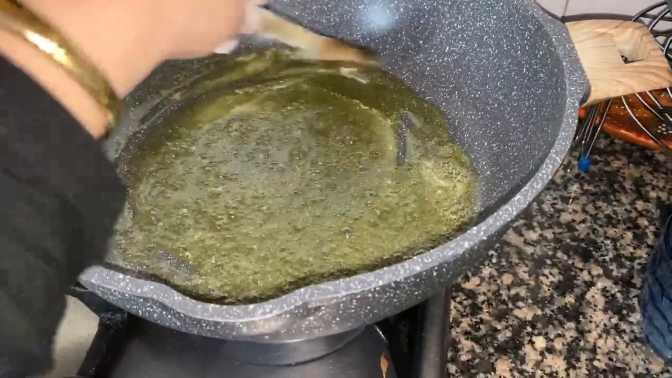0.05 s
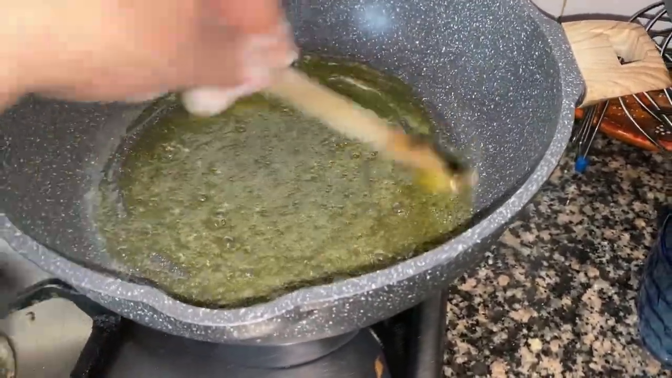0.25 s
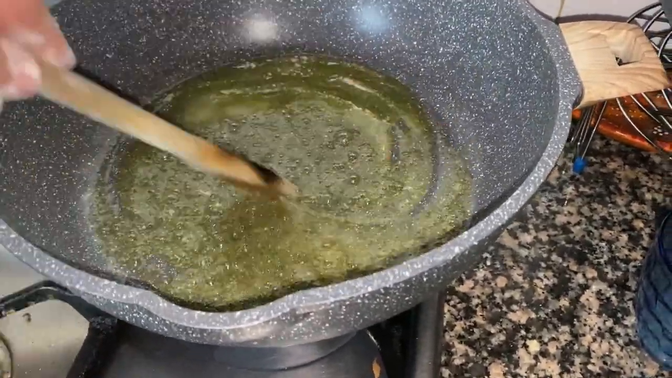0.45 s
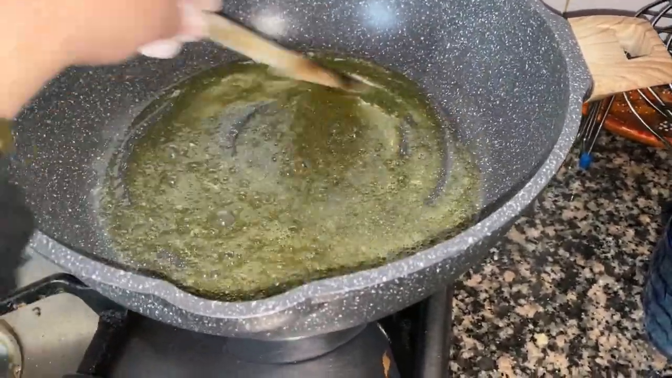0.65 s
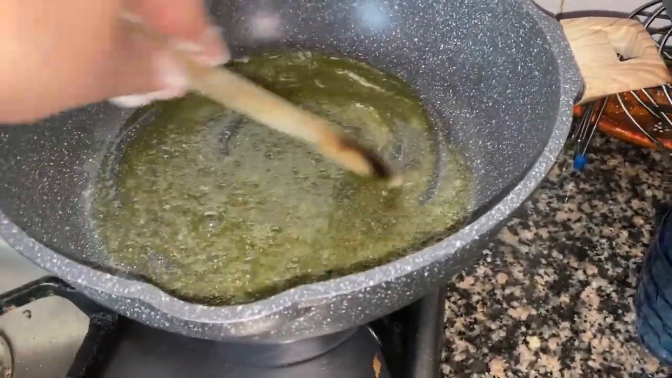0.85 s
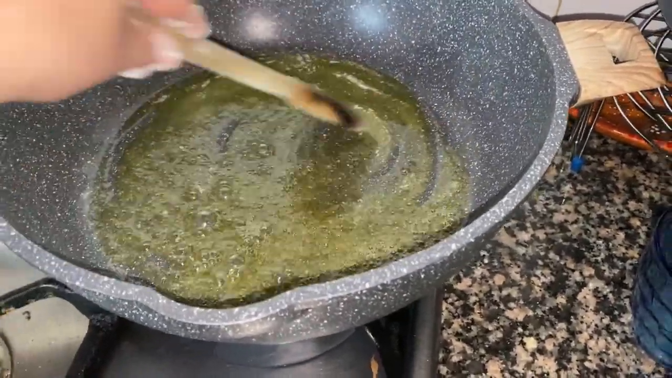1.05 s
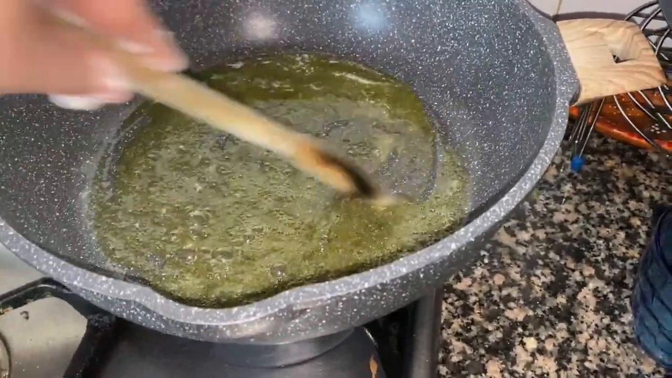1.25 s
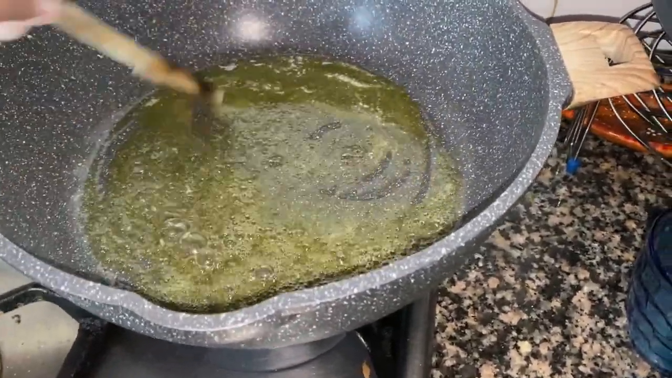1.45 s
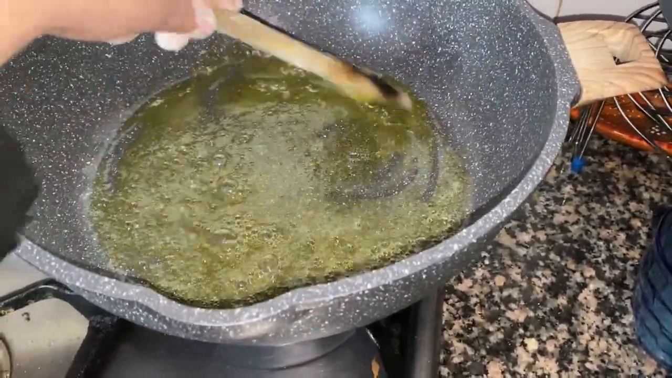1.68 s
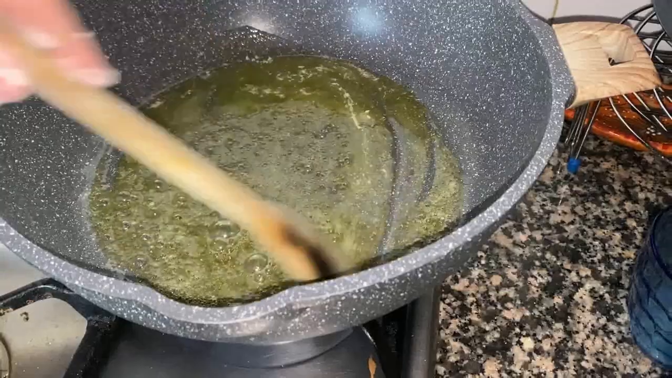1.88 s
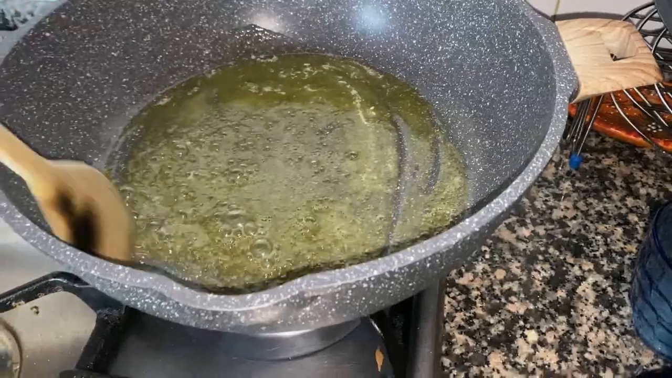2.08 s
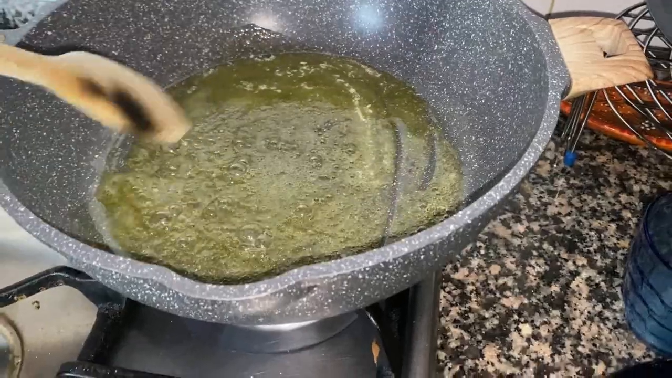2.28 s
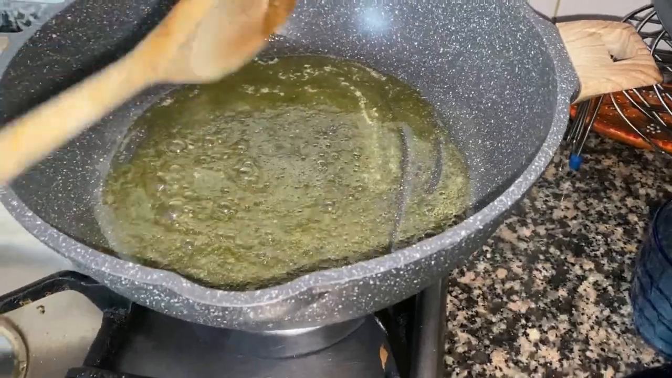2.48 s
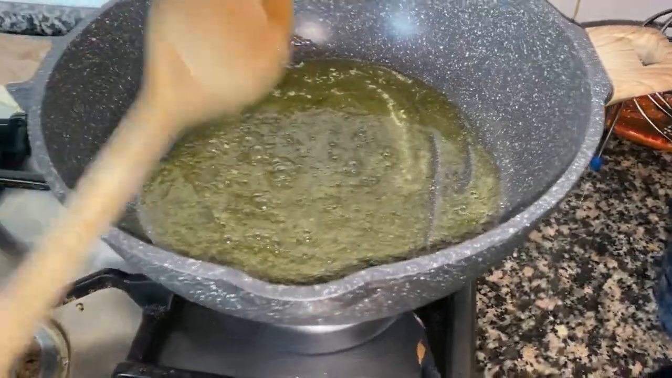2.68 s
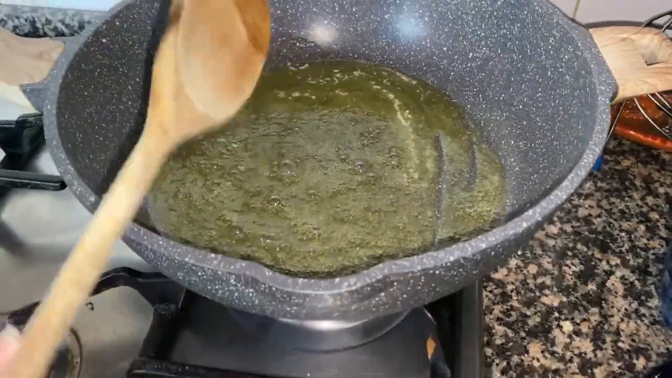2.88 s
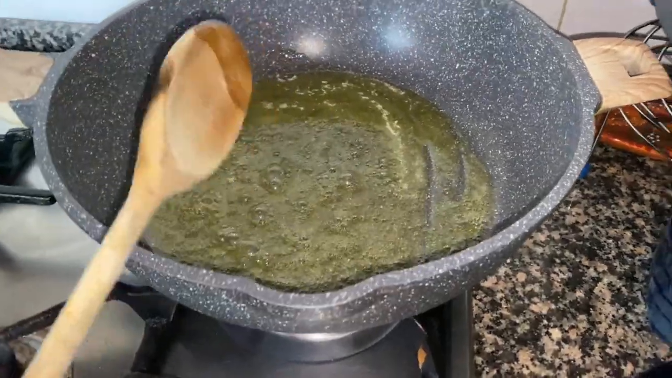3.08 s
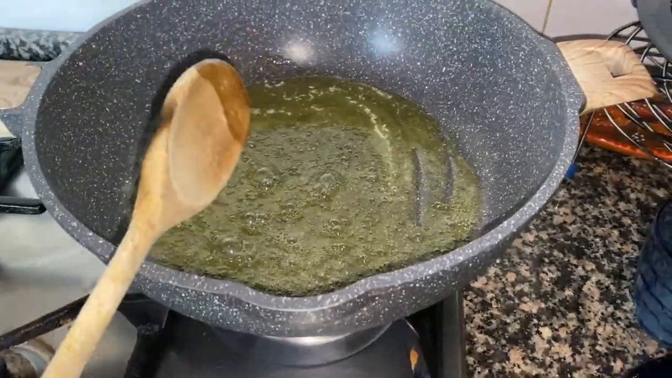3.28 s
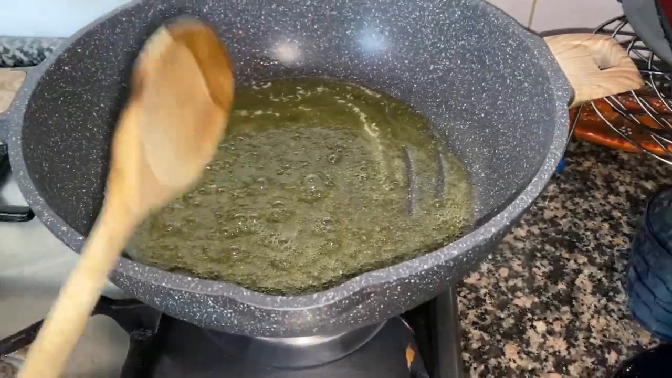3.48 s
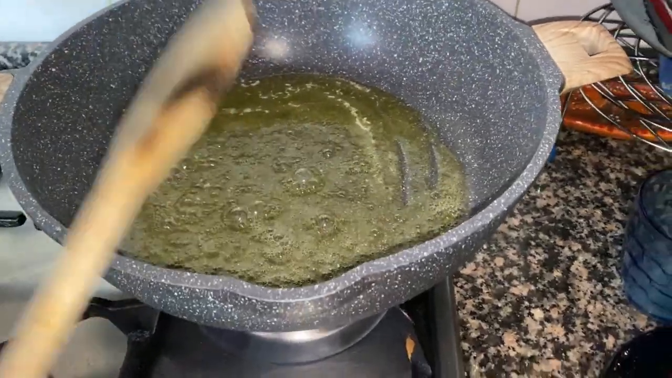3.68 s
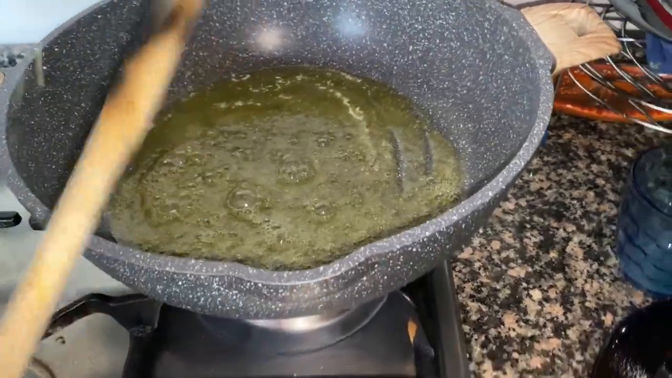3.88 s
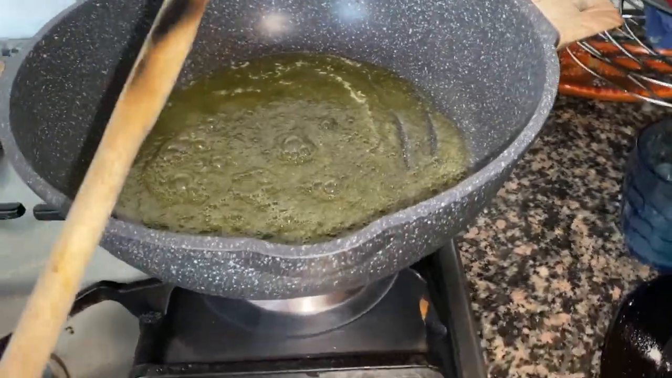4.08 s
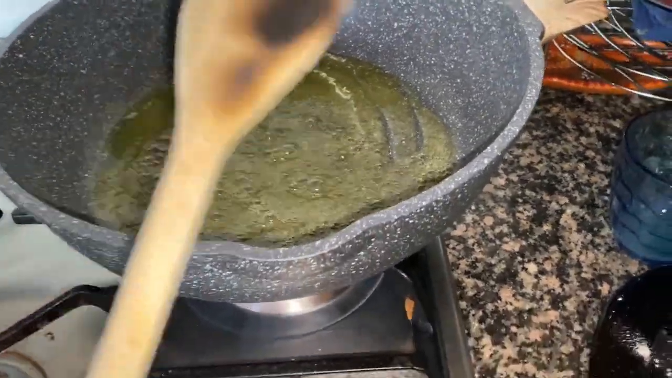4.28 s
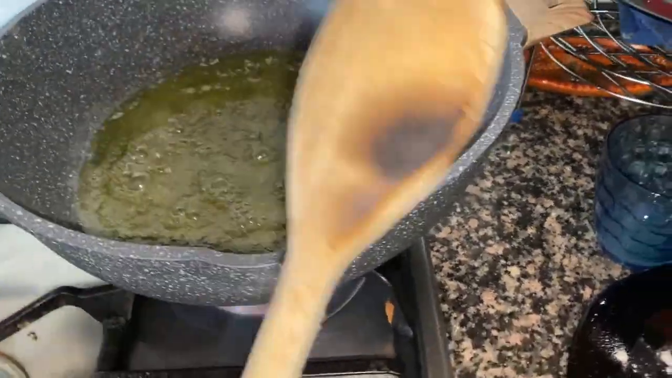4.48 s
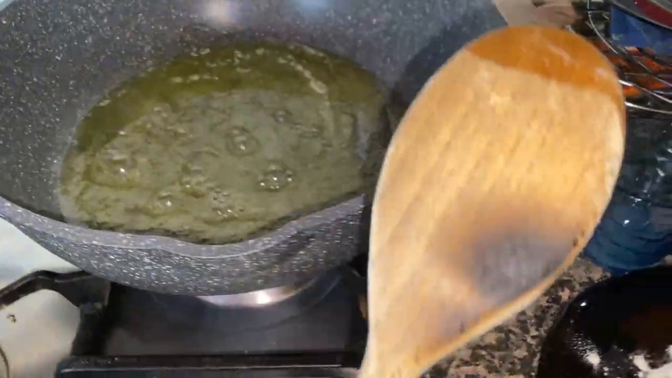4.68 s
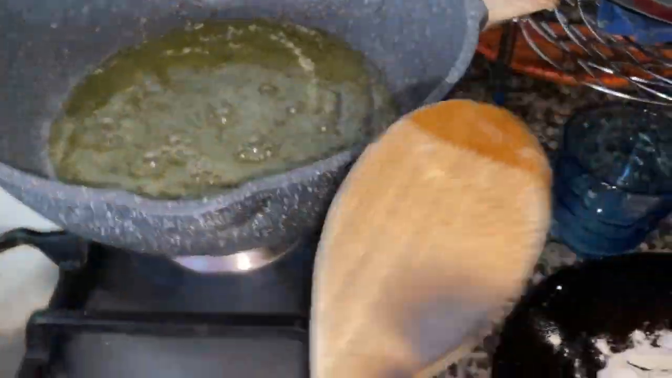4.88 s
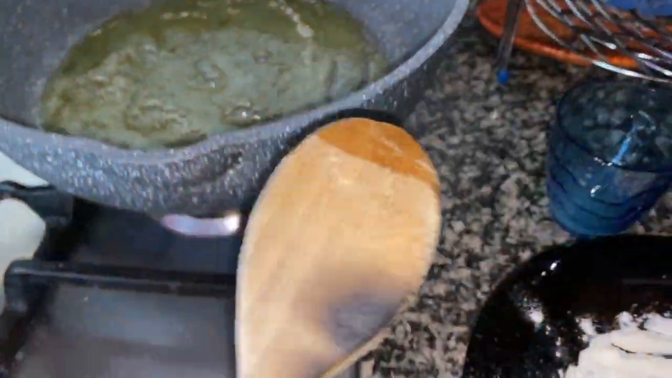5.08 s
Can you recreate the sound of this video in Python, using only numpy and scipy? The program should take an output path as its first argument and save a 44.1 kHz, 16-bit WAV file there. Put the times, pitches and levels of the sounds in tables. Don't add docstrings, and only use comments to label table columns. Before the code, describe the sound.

Close to a hand-held phone in a small, hard-surfaced kitchen, butter sizzles softly in hot oil: fine clumpy crackle over smooth hiss, with separate bright, high bubble pops. A faint gas-burner hiss and room tone lie beneath. From 0 to about 2 s a wooden spoon sweeps round the coated bottom in short, stuttering, gritty scrapes, strongest in the first 0.7 s and again from 1.25 s, quieter between, with very faint contacts and low handling bumps. At 2.0 s it knocks the pan wall once, round and hollow. After a pause with sizzle and pops, four much louder, sharp raps hit the rim at about 2.87, 3.06, 3.26 and 3.47 s, some with quick rebounds; the damped pan clanks briefly, its trivet rattles and the room adds a short tail. From 3.7 to 5.1 s the sizzle calms, dotted with crisp pops.

```python
import sys
import numpy as np
from scipy import signal
from scipy.fft import rfft, irfft, next_fast_len
from scipy.io import wavfile

SR = 44100
rng = np.random.default_rng(int(sys.argv[2]) if len(sys.argv) > 2 else 0)


def store_wav(level_fs):
    pcm = np.round(np.clip(np.atleast_2d(level_fs), -1, 1) * 32767)
    wavfile.write(sys.argv[1], SR, pcm.T.astype(np.int16))


def undo_db(level):
    steps = np.asarray(level, float) / 20
    return 10 ** steps


N = 226718

# middle t/s, length/s, bottom level/dB, wall level/dB, grit level/dB
STROKES = [(0.047, 0.11, -50, -46, -52.5), (0.184, 0.11, -46, -47.5, -47.5), (0.333, 0.14, -43, -57, -51.5),
           (0.413, 0.095, -47.5, -43, -49), (0.517, 0.13, -44.5, -38.5, -48.5),
           (0.65, 0.05, -39.5, -62, -60), (0.887, 0.36, -52.5, -63, -60.5), (1.112, 0.6, -64, -64.5, -64.5),
           (1.273, 0.094, -49.5, -73, -58), (1.39, .18, -43.5, -45.5, -52.5),
           (1.488, 0.074, -43.5, -60, -52), (1.573, 0.15, -49.5, -49, -68), (1.656, 0.032, -39.5, -41, -57),
           (1.797, 0.11, -42, -47.5, -51), (1.922, 0.14, -41, -44, -49), (2.1, 0.1, -59, -62, -50.5)]
# f/Hz, width/Hz, level/dB
SCRAPED = [(323, 120, -7), (572.6, 50, 5.5), (891, 11.3, 0), (1110, 29, -43), (1448, 45, 1),
           (1618, 24, 6.5), (2220, 120, 1.5), (3620, 310, -1), (4400, 32, 16), (4690, 20, 20)]


def rms_one(x):
    return x / np.sqrt(np.mean(x ** 2) + 1e-20)


def in_time(rows):
    s, *columns = np.transpose(rows)
    return [np.interp(np.arange(N) / SR, s, c, right=-120) for c in columns]


def at_hz(points, hz):
    table_hz, values = np.array(points)[:, 0], np.array(points)[:, 1]
    return np.interp(np.log(hz), np.log(table_hz), values)


def swells(rows):
    middle, length, *columns = np.transpose(rows)
    offset = (np.arange(N) / SR - middle[:, None]) / length[:, None]
    bells = np.exp(-8 * np.square(offset))
    return [np.sqrt(undo_db(c) ** 2 @ bells) for c in columns]


def drift(rate_hz):
    r = np.exp(-80 * np.pi * rate_hz / SR)
    white = rng.standard_normal(N // 40 + 2002)
    slow = signal.lfilter([1], [1, -2 * r, r * r], white)[2000:]
    return np.interp(np.arange(N) / 40, np.arange(len(slow)), rms_one(slow))


def grains(per_s, spread_db):
    sizes = undo_db(spread_db * np.minimum(rng.exponential(1, N), 5))
    signs = rng.choice([-1, 1], N)
    return sizes * signs * (rng.random(N) < per_s / SR)


def ring(clicks, hz, t60):
    r, w = undo_db(-60 / (t60 * SR)), 2 * np.pi * min(hz, 19000) / SR
    return signal.lfilter([0, np.sin(w)], [1, -2 * r * np.cos(w), r * r], clicks + 1e-18)


def resonances(x, peaks):
    out = 0
    for k, (hz, width, db) in enumerate(peaks):
        r = np.exp(-np.pi * width / SR)
        b = (1 - r * r) / 2 * np.array([1, 0, -1])
        a = [1, -2 * r * np.cos(2 * np.pi * hz / SR), r * r]
        out = out + (-1) ** k * undo_db(db) * signal.lfilter(b, a, x)
    return out


def band_pass(x, low_hz, high_hz):
    return signal.sosfilt(signal.butter(2, [low_hz, high_hz], "band", fs=SR, output="sos"), x)


def stereo_noise(size, spectrum, t60s=None):
    # f/Hz, likeness 0 to 1
    likeness = [(30, 1), (125, 0.78), (500, 0.36), (2000, 0.1), (6000, 0.13)]
    out, edges, t = 0, 22 * 2 ** np.arange(0, 9.9, .5), np.arange(size) / SR
    white = rng.standard_normal((2, 2, size))
    for k, (low, high) in enumerate(zip(edges, edges[1:])):
        mid, side = band_pass(white[k % 2], low, high)
        hz = np.sqrt(low * high)
        alike = np.clip(at_hz(likeness, hz), 0, 1)
        fall_db, rise = 0, 1
        if t60s is not None:
            fall_db = -60 * t / at_hz(t60s, hz)
            rise = 1 - np.exp(-t * hz / 0.72)
        pair = np.sqrt(1 + alike) * mid + np.sqrt(1 - alike) * side * [[1], [-1]]
        out = out + rise * undo_db(at_hz(spectrum, hz) + fall_db) * pair
    return out


def background():
    # f/Hz, level/dB per Hz
    room_tone = [(20, -28), (79, -6), (500, 0), (1060, -6.5), (1260, -14), (1970, -25), (5000, -21),
                 (6500, -46)]
    # f/Hz, width/Hz, level/dB
    burner = [(568.5, 35, 1), (1068.5, 28, -2), (1702, 28, -1.5)]
    tone = rms_one(stereo_noise(N, room_tone))
    jets = resonances(rng.standard_normal((2, N)), burner)
    jets = rms_one(resonances(jets, [(hz, 3 * width, 0) for hz, width, db in burner]))
    return undo_db(-60) * (undo_db(-0.5) * tone + undo_db(-1.0 + drift(2.7)) * jets)


def handling():
    # middle t/s, length/s, rumble level/dB
    bumps = [(0.02, 0.087, -30.5), (0.4, 1, -61), (1.0, 0.41, -64), (0.79, 0.065, -60),
             (1.17, 0.042, -48.5), (1.23, 0.035, -34), (1.295, .03, -40.5), (1.35, 0.075, -30),
             (1.45, 0.041, -36), (1.57, 0.17, -45), (1.75, 0.25, -52), (1.94, 0.11, -52),
             (2.23, 0.045, -61), (2.9, 0.039, -24.5), (3.11, 0.14, -35.5), (3.265, 0.033, -49),
             (3.35, 0.1, -38), (3.485, 0.074, -32), (3.6, 0.17, -39), (3.87, 0.45, -60.5),
             (4.2, 0.79, -67.5), (4.6, 0.13, -64), (5.1, 1, -67.5)]
    rumble = [(25, -60), (45, 1), (80, 0.5), (140, -2), (250, -53), (500, -59), (1000, -85)]   # f/Hz, dB per Hz
    return swells(bumps)[0] * rms_one(stereo_noise(N, rumble))


def sizzle():
    # t/s, level/dB
    flare = [(0.0, -57.5), (0.13, -50.5), (0.9, -57), (1.33, -54), (1.9, -52.5), (2.4, -56), (2.9, -52.5),
             (3.44, -58.5), (3.7, -57.5), (5.14, -62)]
    # f/Hz, level/dB per Hz
    fizz = [(1500, -6.5), (3500, -12), (5200, -4.5), (7000, -7), (9000, -8), (12000, -7.5), (14000, -11),
            (16500, 6)]
    clicks = grains(2500 * undo_db(4.5 * drift(17.0)), spread_db=5.5)
    pitches, dealt = np.geomspace(3000, 16000, 16), rng.integers(0, 16, N)
    crackle = 0
    for k, hz in enumerate(pitches):
        crackle = crackle + undo_db(at_hz(fizz, hz)) * hz * ring(clicks * (dealt == k), hz, 35.0 / hz)
    hiss = rms_one(stereo_noise(N, [(700, -48.0)] + fizz))
    return undo_db(in_time(flare)[0] + 4.0) * (undo_db(-4.5) * rms_one(crackle) + undo_db(-3.0) * hiss)


def bursts_table():
    # t/s, peak level/dB, f/Hz, snap level over the ring/dB
    clear = [(0.0485, -27, 6000, -20), (0.1732, -33, 4130, -18), (0.2784, -30, 13900, -10),
             (0.5695, -26.5, 8900, -22), (0.6205, -30.5, 8700, -11), (0.667, -33.5, 9000, -18),
             (0.8768, -32, 9300, -26), (1.2733, -24.5, 5600, -34), (1.6155, -36, 8140, -8),
             (1.6653, -22.5, 8040, -27), (1.822, -31, 6200, -23), (2.2567, -33, 11800, -9),
             (2.349, -39.5, 5350, -26), (2.4355, -39.5, 5700, -9), (2.5922, -28, 8900, -20),
             (2.7027, -29.5, 5270, -29), (3.8226, -33.5, 8500, -11), (3.854, -32, 9490, -12),
             (3.9386, -37, 7040, -14.5), (3.996, -33.5, 10200, -7.5), (4.0618, -33.5, 10450, -9),
             (4.126, -30.5, 5530, -34), (4.155, -30, 7600, -24), (4.272, -33.5, 7160, -18),
             (4.395, -39, 12150, -3), (4.7236, -31.5, 11300, -9), (4.7643, -42.5, 6200, -19),
             (4.8449, -31.5, 8300, -18.5), (4.8974, -31.5, 7500, -26), (4.9886, -31.5, 13100, -4)]
    twins = [(s + 0.008, db - 26, 1.16 * hz, snap_db) for s, db, hz, snap_db in clear]
    faint_db, spread_db, snap_db = -41, 2, -26
    luck = rng.random((55, 3))
    faint = [(a * N / SR, faint_db + spread_db * (4 * b - 2), 5500 * 2.36 ** c, snap_db) for a, b, c in luck]
    return clear + twins + faint


def pops():
    out, t = np.zeros(N + 4000), np.arange(4000) / SR
    table = bursts_table()
    scatter = rng.standard_normal((len(table), 4000)) * undo_db(-60 * t / 0.042 - 14.5) * (t > .0015)
    click = np.eye(1, 4000, round(.0005 * SR))[0]
    bright = signal.butter(2, 9000, "high", fs=SR, output="sos")
    for (s, db, hz, snap_db), echo in zip(table, scatter):
        cycles = 11.8 + 5.8 * np.log2(hz / 8000)
        age = t * hz / max(cycles, 2) * 6.4
        bubble = age * np.exp(1 - age) * np.sin(2 * np.pi * hz * t)
        above = signal.butter(2, 0.36 * hz, "high", fs=SR, output="sos")
        tail = signal.sosfilt(above, ring(echo, hz, 13.0 / hz))
        snap = undo_db(snap_db + 2.0) * signal.sosfilt(bright, click + 0.24 * echo)
        out[round(s * SR):][:4000] += undo_db(db + 0.5) * (bubble + tail + snap)
    return out[:N]


def sweep_phase():
    middle, length, *_, grit_db = np.transpose(STROKES)
    phase = 2 * (np.arange(0, N, 64) / SR - middle[:, None]) / length[:, None]
    weight = undo_db(grit_db)[:, None] ** 2 * np.exp(-2 * phase ** 2) + 1e-30
    strongest = (weight * np.clip(phase, -1, 1)).sum(0) / weight.sum(0)
    return np.repeat(strongest, 64)[:N]


def swish():
    level = swells(STROKES)[2]
    centre_hz = 1850 * 2 ** (-0.5 * sweep_phase())
    grit, out = grains(6000, spread_db=2.0), 0
    grit = grit + undo_db(12.5) * resonances(grit, SCRAPED[3:8])
    for hz in np.geomspace(1200, 5600, 8):
        band = band_pass(grit, hz / 1.12, hz * 1.12)
        octaves_off = np.log2(hz / np.maximum(centre_hz, 800))
        out = out + undo_db(-12 * octaves_off ** 2) * band / np.sqrt(hz)
    return undo_db(-0.5) * level * rms_one(out)


def stirring():
    wall_share = 0.71
    on_bottom = swells(STROKES)[0]
    on_wall = swells(np.array(STROKES) * [1, wall_share, 1, 1, 1])[1]
    slips = grains(1500 * undo_db(3.5 * drift(25.0)), spread_db=3.5)
    low = band_pass(slips, 250, 700)
    bottom = rms_one(resonances(slips, SCRAPED[:2] + [(515, 35, 5)]) + undo_db(-48.5) * low)
    wall = rms_one(resonances(slips, [(888, 17, 0)]))
    deep = rms_one(resonances(slips, [(222.0, 3.9, 0)]))
    return on_bottom * (undo_db(-2.5) * bottom + undo_db(-24) * deep) + undo_db(-4.5) * on_wall * wall


def taps():
    # t/s, peak level/dB, contact/ms, wall ring level/dB, bowl level/dB
    blows = [(0.647, -43, 0.94, -24, -5.5), (1.638, -35, 0.75, -20, 1), (1.9926, -14, 0.51, 0, -15.5),
             (2.86, -13, 0.12, -3.5, -12), (2.8702, -8, 0.085, -6.5, -4.5),
             (2.9008, -14.5, 0.17, -39, -9.5), (3.0616, -6, 0.087, -2.5, -9.5),
             (3.107, -12, 0.098, -14, -9), (3.2577, -5.5, 0.081, -3.5, -15.5),
             (3.267, -14.5, 0.022, -30, -5.5), (3.4658, -9, 0.086, 2, -2), (3.49, -13.5, 0.1, -26, -11),
             (0.7644, -34, 0.92, 9.5, -1.5), (1.666, -33.5, 0.46, -16, -22)]
    # f/Hz, level/dB, t60/s
    pan_modes = [(1019, 3.5, .4), (1130, -8.5, 0.5), (1486, 7.5, 0.36), (1636, -1, 0.4), (1684, 5, 0.3),
                 (1907, 0, 0.17), (2126, -2, 0.34), (2183, 10.5, 0.18), (2430, -14, 0.2),
                 (2620, -9.5, 0.15), (3200, -1.5, 0.2), (3426, 4, 0.28), (3550, -18.5, 0.25),
                 (4027, 12, 0.057)]
    # f/Hz, level/dB, t60/s
    wall_pair = [(885, 0, .2), (894, -13, .36)]
    # f/Hz, level/dB, t60/s
    wall_modes = [(1514, -9, 0.076), (1637, 3, 0.043), (1700, 10, 0.012), (2430, -12, .08),
                  (2540, -4, 0.086)]
    # f/Hz, level/dB, t60/s
    bowl_modes = [(99.97, -18, 1.08), (133.3, -4, 0.21), (207.4, -12, 0.33), (326, -2.5, 0.077),
                  (508, -3, 0.55), (541, -3.5, 0.23)]
    # f/Hz, level/dB per Hz
    rattle = [(45, -44), (80, -2), (350, -11), (520, -2), (730, -31), (1000, -5), (2500, -3.5),
              (10000, -10.5)]
    # f/Hz, t60/s
    rattle_t60 = [(100, 0.21), (500, 0.43), (2000, 0.13), (8000, 0.082), (16000, 0.029)]
    out, size = np.zeros((2, N + SR)), SR // 2
    click, t = np.eye(1, size)[0], np.arange(size) / SR
    damped_s = .09
    pan = np.array([undo_db(db - 14.5) * ring(click, hz, min(t60 / 3, damped_s)) for hz, db, t60 in pan_modes])
    wall = sum(undo_db(db) * ring(click, hz, t60) for hz, db, t60 in wall_pair + wall_modes)
    wall = wall * (1 - np.exp(-t / .003))
    bowl = np.array([undo_db(db) * ring(click, hz, t60) for hz, db, t60 in bowl_modes])
    bowl = bowl * (1 - np.exp(-t / .010))
    spread = rng.standard_normal((len(blows), 2, len(pan_modes) + len(bowl_modes)))
    for (s, db, contact_ms, wall_db, bowl_db), luck in zip(blows, undo_db(2.5 * spread)):
        contact = signal.butter(2, np.clip(600 / contact_ms, 300, 19000), fs=SR, output="sos")
        shake = stereo_noise(size // 2, rattle, rattle_t60)
        shake = shake / np.std(shake[:, :400])
        blow = luck[:, :len(pan_modes)] @ pan + undo_db(wall_db) * wall
        blow = blow + undo_db(bowl_db) * luck[0, len(pan_modes):] @ bowl
        blow[:, :size // 2] += undo_db(-2 - 7 * contact_ms) * shake
        blow = blow * (1 - np.exp(-t / .002))
        out[:, round(s * SR):][:, :size] += undo_db(db - 4) * signal.sosfilt(contact, blow)
    return out[:, :N]


def kitchen(x):
    # f/Hz, t60/s
    room_t60 = [(100, 0.82), (700, 0.45), (2000, 0.44), (5000, 0.44), (16000, 0.04)]
    tail = stereo_noise(SR // 2, [(30, 0), (16000, 0.0083)], room_t60)
    tail = tail / np.sqrt(np.sum(tail ** 2) / 2)
    tail = np.pad(tail, ((0, 0), (round(.006 * SR), 0)))
    return signal.fftconvolve(x[None], tail, axes=1)[:, :N]


def scene():
    blows, stir, bursts = taps(), stirring() + swish(), pops()
    pan = blows + stir * undo_db([[1.0], [-1.0]]) + bursts + sizzle()
    away = signal.lfilter(*signal.iirnotch(886, 7, fs=SR), blows.mean(0))
    wet = kitchen(undo_db(-8.5) * away + undo_db(-2.0) * stir + undo_db(-13.0) * bursts)
    return pan + wet + handling() + background()


def band_limit(x):
    return signal.sosfilt(signal.butter(12, 16830, fs=SR, output="sos"), x)


def record(dry):
    # f/Hz, left minus right level/dB
    leaning = [(60, 1), (200, 0.2), (380, 1), (700, 7), (1290, 2), (4400, 1), (8120, 2), (15000, -6)]
    size = next_fast_len(N + 1024)
    left, right = rfft(dry, size)
    hz = np.arange(len(left)) * SR / size
    lean = undo_db(at_hz(leaning, hz + 1) / 2)
    left, right = left * lean, right / lean
    turn = 2 * np.pi * np.clip((hz - 6900) / 4300, 0, 2)
    shared = np.clip((hz - 5600) / 1300, 0, 1)
    right = (1 - shared) * right + shared * left * np.exp(1j * turn)
    x = irfft(np.array([left, right]), size)[:, :N]
    x = signal.sosfilt(signal.cheby2(12, 30, 16150, fs=SR, output="sos"), x)
    return band_limit(1.166 * np.tanh(x / 0.95))


dry = scene()
out = record(dry)
store_wav(out)
```